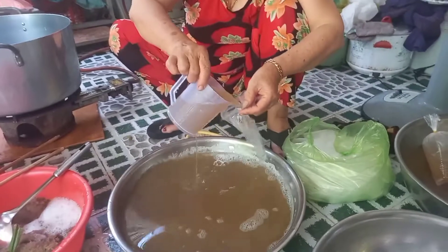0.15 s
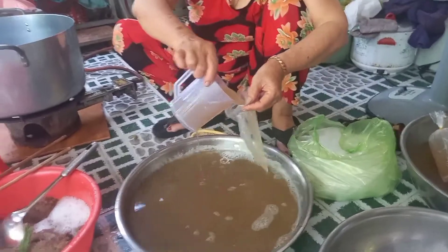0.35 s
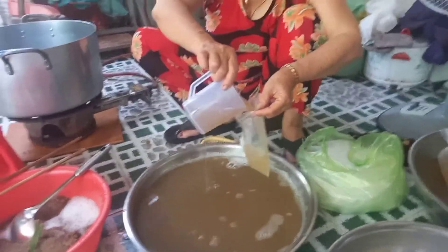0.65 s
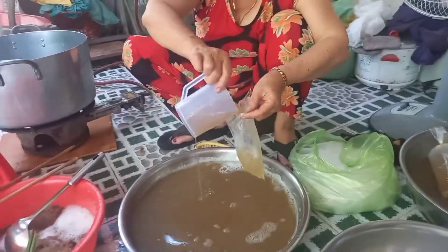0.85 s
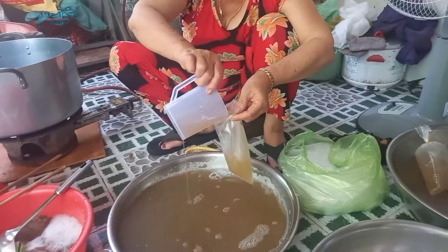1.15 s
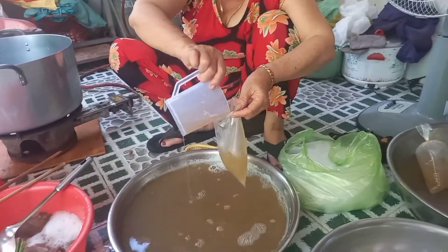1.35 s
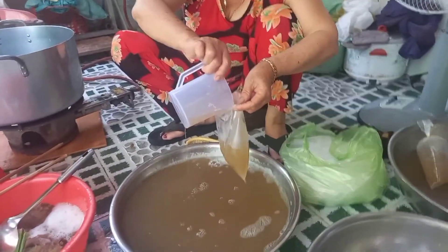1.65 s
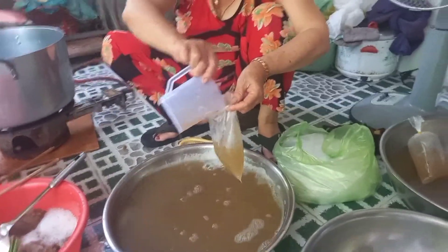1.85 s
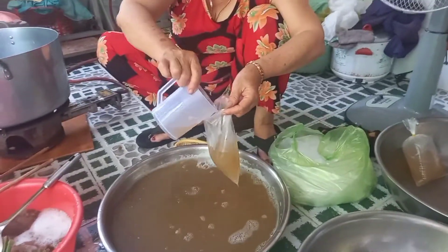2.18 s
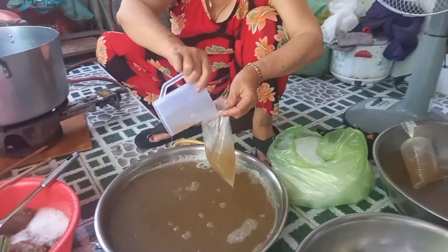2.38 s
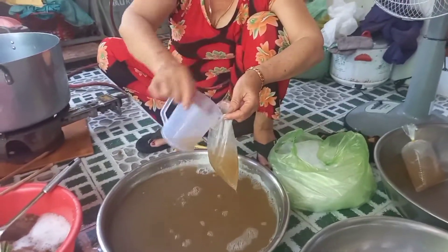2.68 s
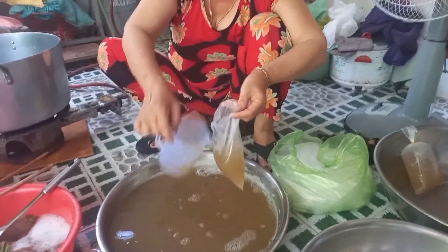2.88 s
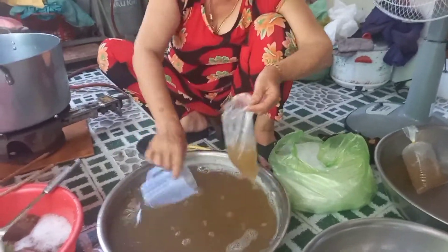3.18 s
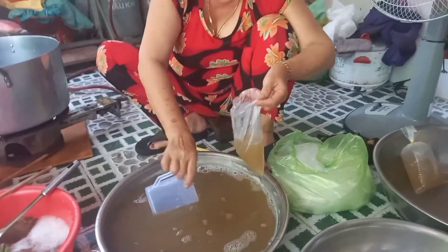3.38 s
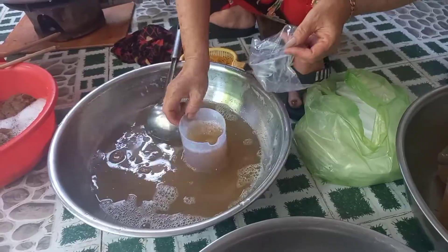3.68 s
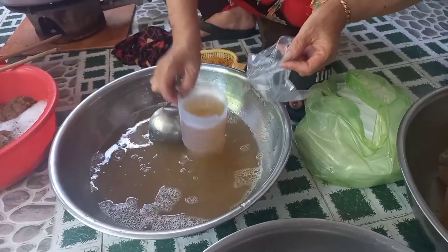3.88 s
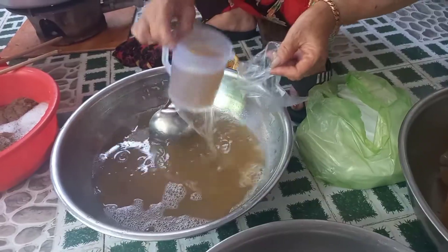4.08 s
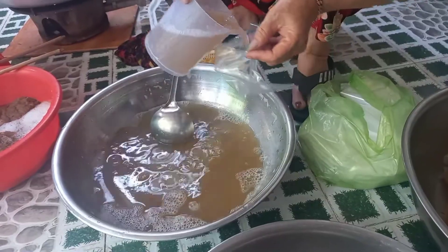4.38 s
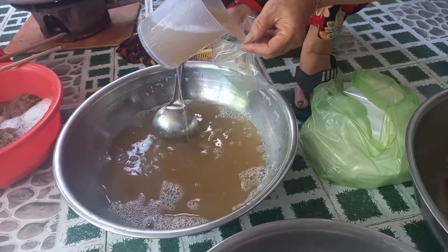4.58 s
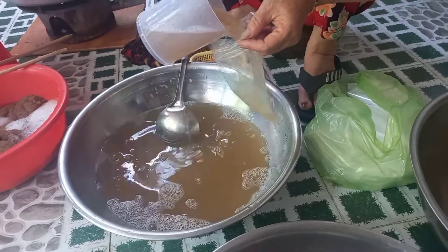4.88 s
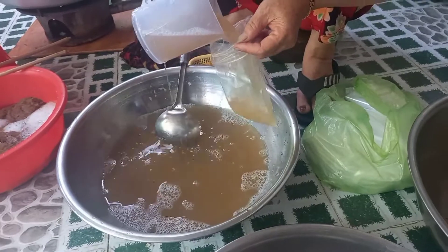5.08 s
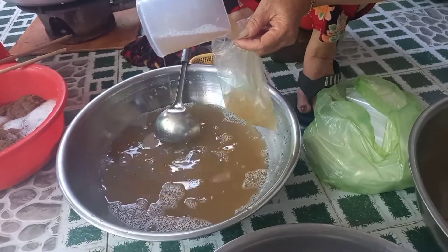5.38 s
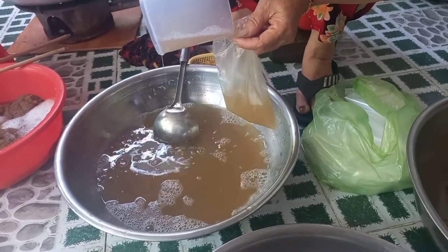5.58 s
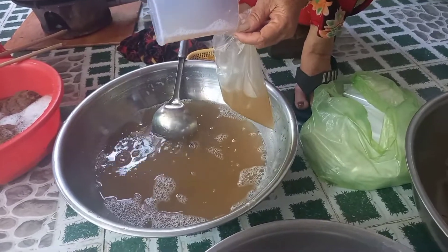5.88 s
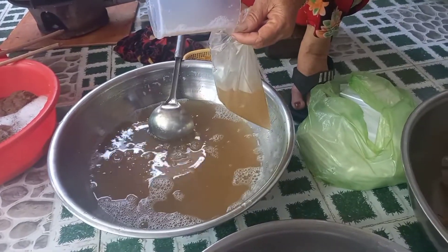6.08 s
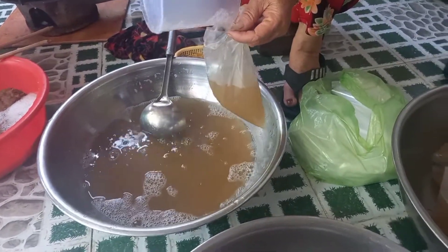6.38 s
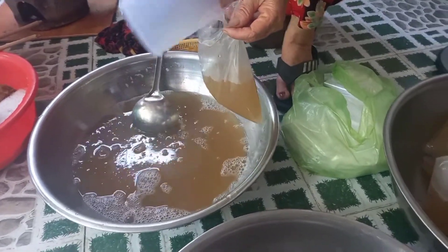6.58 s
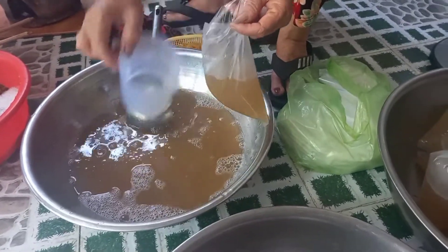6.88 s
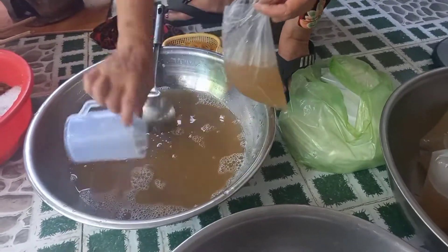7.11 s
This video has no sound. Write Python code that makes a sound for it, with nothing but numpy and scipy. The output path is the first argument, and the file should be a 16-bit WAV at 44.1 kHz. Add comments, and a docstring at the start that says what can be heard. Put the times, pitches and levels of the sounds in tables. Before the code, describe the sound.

Two pours of liquid bubble and drip into small plastic bags that snap and rustle, while cicadas whine outside the room.

```python
"""In an open room, liquid is poured from a jug into thin plastic bags. Bubbles ring as blips and
gurgles, air glugs in the jug, and the plastic snaps and rustles in tiny cracks. Outside, cicadas
click so fast that they whine; a fan throbs, and later a far motor hums. There are two parts with
a short silence between them: the first is close and loud, the second comes up from a low level."""
import sys
import numpy as np
from scipy import signal
from scipy.fft import rfft, irfft, next_fast_len
from scipy.io import wavfile
from scipy.ndimage import uniform_filter1d, map_coordinates

SR = 44100
rng = np.random.default_rng(int(sys.argv[2]) if len(sys.argv) > 2 else 0)


def transcribe(u):
    """Save the signal u as a 16-bit wav file named by the first command-line argument.

    u: samples, shape (n,) or (channels, n), limited to [-1, 1]; the rate is SR.
    q: integer samples, one column per channel.
    """
    v = np.clip(np.atleast_2d(u).T, -1, 1)
    q = np.round(v * 32767).astype(np.int16)
    wavfile.write(sys.argv[1], SR, q)


N = 319725
TIME = np.arange(N) / SR
# The two parts of the scene: start_s, end_s
PARTS = [(0, 3.337), (3.4757, 7.3)]
FIRST, SECOND = PARTS


def amp(db):
    return 10 ** (np.asarray(db) / 20)


def unit(x):
    """Scale a signal to an average power of 1."""
    return x / np.sqrt(np.mean(x ** 2) + 1e-20)


def along(points, hz):
    """Look up a value between rows of (pitch_hz, value), on a log scale of pitch."""
    pitches, values = np.transpose(points)
    return np.interp(np.log(hz + 1), np.log(pitches + 1), values)


def curves(rows):
    """Join the dots: one value per sample for each column after the time."""
    times, *columns = np.transpose(rows)
    return [np.interp(TIME, times, column) for column in columns]


def sides(pan_db):
    """Left and right gains; a positive pan_db is louder on the left."""
    return amp(np.vstack([pan_db / 2, -pan_db / 2]))


def add(out, start_s, sound):
    """Mix a short sound in at its start time."""
    out[:, round(start_s * SR):][:, :sound.shape[-1]] += sound


def wobble(rate_hz, channels=1):
    """Smooth random curves that pass rate_hz random points a second."""
    points = rng.standard_normal((channels, int(N * rate_hz / SR) + 4))
    coarse = np.arange(0, N + 16, 16)
    smooth = [map_coordinates(row, [coarse * rate_hz / SR]) for row in points]
    return np.array([np.interp(np.arange(N), coarse, row) for row in smooth])


def filtered(x, gain):
    """Turn each frequency up or down by gain(hz)."""
    size = next_fast_len(x.shape[-1] + 8192)
    return irfft(rfft(x, size) * gain(np.fft.rfftfreq(size, 1 / SR)), size)[..., :x.shape[-1]]


# How alike noise is in the two ears (1 is the same): pitch_hz, likeness
EAR_LIKENESS = [(30, 1), (200, 0.83), (500, 0.82), (1200, 0.42), (3000, 0.047), (15000, 0.15)]

def rush(spectrum, patchy_db, span=(0, 8)):
    """Stereo noise with random louder and softer patches, silent outside the span (in seconds)."""
    start, end = round(span[0] * SR), min(round(span[1] * SR), N)
    cells = signal.stft(rng.standard_normal((2, end - start)), nperseg=512)[2]
    patches = uniform_filter1d(rng.standard_normal(cells.shape[1:]), 6, axis=0)
    patches = unit(uniform_filter1d(patches, 10, axis=1))
    noise = signal.istft(cells * amp(patchy_db * patches), nperseg=512)[1][:, :end - start]

    def gain(hz):
        spread = np.arccos(np.clip(along(EAR_LIKENESS, hz), -1, 1)) / 2
        return amp(along(spectrum, hz)) * [np.cos(spread), np.sin(spread)]

    mid, side = filtered(noise, gain)
    left = np.roll(mid + side, 12)  # reaches the left ear 12 samples later
    return np.pad(unit(np.array([left, mid - side])), ((0, 0), (start, N - end)))


def background_db(start, first_end, low, risen, end):
    """A level that drifts through each part and comes up early in the second."""
    rise_s = (3.98, 4.86)
    return np.interp(TIME, [*FIRST, SECOND[0], *rise_s, SECOND[1]],
                     [start, first_end, low, low, risen, end])


# The tone of the moving air in each part: pitch_hz, level_db
FIRST_AIR = [(18, -58.5), (30, -8.5), (92, -4.5), (188, -14), (280, -12.5), (454, -17), (564, -15.5),
             (685, -18.5), (814, -17.5), (1690, -19.5), (1890, -22), (2550, -22.5), (3600, -29),
             (5200, -23.5), (6760, -72), (11400, -120)]
SECOND_AIR = [(140, -5), (240, -4), (280, -6), (396, -5.5), (475, -10.5), (951, -16.5), (1300, -14),
              (1830, -20), (2470, -15), (4070, -27), (5200, -20), (6760, -60), (11400, -120)]

def air():
    """Moving air makes a low, uneven rush."""
    level_db = background_db(-30.5, -33.5, -61.5, -45.5, -47) + 1.03 * wobble(8)
    first = rush(FIRST_AIR, patchy_db=1.26, span=(0, SECOND[0]))
    second = rush(SECOND_AIR, patchy_db=1.3, span=SECOND)
    return amp(level_db) * (first + second)


# The tone of the high hiss: pitch_hz, level_db
HISS_TONE = [(3500, -120), (4500, -28), (5330, -5), (5550, 6), (6100, 9), (6900, 2), (7600, -14), (9000, 0),
             (12500, -12), (13300, -20), (15800, -36)]

def hiss():
    """Plastic and far insects blur into a high hiss."""
    level_db = background_db(-36.5, -37, -60, -48, -45.5) + 0.51 * wobble(5.7)
    return amp(level_db) * rush(HISS_TONE, patchy_db=2.2) * sides(-.8)


def hum(tones, blur, fade_db, tilt_db=0 * TIME):
    """Low tones that waver (blur) and trade strength; tilt_db favours those above 196 Hz."""
    step = 16  # low tones need only every 16th sample
    t, tilt_db = TIME[::step], tilt_db[::step]

    def slow(rate_hz):
        return map_coordinates(rng.standard_normal(int(N * rate_hz / SR) + 4), [t * rate_hz])

    gains = np.array([amp(db + fade_db * slow(5.4) + tilt_db * np.sign(hz - 196) / 2)
                      for hz, db in tones])
    gains /= np.linalg.norm(gains, axis=0)
    total = 0
    for gain, (hz, _) in zip(gains, tones):
        phase = 2 * np.pi * hz * t + blur * slow(6)
        ear_drift = 0.27 * np.array([slow(4.4), slow(2.9)])
        total += gain * np.cos(phase + ear_drift)
    return unit(signal.resample_poly(total, step, 1, axis=1)[:, :N])


# How loud the fan is: time_s, level_db
FAN_LEVEL = [(0, -35), (1.2, -34), (1.45, -37), (1.9, -37.5), (2.25, -29), (2.6, -33.5), (3.1, -31.5),
             (3.23, -28.5), (3.4, -45), (3.47, -66.5), (4, -68), (4.5, -50.5), (4.85, -45), (5.2, -47.5),
             (5.8, -43.5), (6.3, -46.5), (7.25, -47.5)]
# The tones of its blades: pitch_hz, level_db
FAN_TONES = [(56, -8), (66.5, -5), (83, -2.5), (100, 0), (117, -5)]

def fan():
    """Turning blades push the air in a deep, unsteady throb."""
    (level_db,) = curves(FAN_LEVEL)
    return amp(level_db + 1.5 * wobble(7)) * hum(FAN_TONES, blur=.9, fade_db=4)


# How loud the motor is, and how far its upper tones are favoured: time_s, level_db, tilt_db
MOTOR_LEVEL = [(3.48, -76, 8), (3.95, -74.5, 7), (4.05, -62.5, 6), (4.5, -55.5, -6), (4.76, -62, -1),
               (4.89, -45.5, 2), (5.45, -40.5, 5), (5.63, -42.5, -1), (5.84, -42, -16), (6.1, -38.5, -3.5),
               (6.48, -45, -0.5), (6.62, -40.5, 11), (6.86, -46.5, -4), (7.06, -46.5, -6), (7.25, -48, 1)]
# The tones of its hum: pitch_hz, level_db
MOTOR_TONES = [(151, -8), (181.2, -1.5), (211.4, 0), (241.6, -17.5), (332, -13.5), (392, -17)]

def motor():
    """A far motor hums, in the second part only."""
    level_db, tilt_db = curves(MOTOR_LEVEL)
    level = (TIME > SECOND[0]) * amp(level_db + .6 * wobble(6))
    return level * hum(MOTOR_TONES, blur=0.2, fade_db=1.2, tilt_db=tilt_db)


def cicada(rate, song, side, voice, span, pulse, pulse_hz, blur, fade_db, drift_hz):
    """A cicada clicks drum-like skins on its body, making tones at multiples of the click rate."""
    here = slice(round(span[0] * SR), round(span[1] * SR))
    level_db, pan_db = curves(song)[0][here], curves(side)[0][here]
    swelling, steady = amp(level_db), amp(uniform_filter1d(level_db, SR // 2))
    phase = 2 * np.pi * np.cumsum(curves(rate)[0][here]) / SR
    rasp = .16 if span[0] > 0 else .3  # how uneven the clicks are
    step = 64  # samples between points of the slow curves
    t = span[0] + np.arange(len(level_db) // step + 3.5) * step / SR
    between = np.arange(step) / step
    smoother = np.array([map_coordinates(row, [(t - span[0]) * drift_hz]) for row in np.eye(48)])
    offsets, offset_db = np.transpose(pulse)
    out = np.zeros((2, N))
    for multiple, db in voice:
        level = swelling if db > -3 else steady  # only the strongest tones swell quickly
        tone = level * np.exp(1j * multiple * phase)
        for ear in out:
            # Pulsing splits the tone into close neighbours, which echoes fade one by one.
            fade, drift = rng.standard_normal((2, len(offsets), len(smoother))) @ smoother
            turns = pulse_hz * np.outer(offsets, t) + rng.random((len(offsets), 1))
            gains = amp(offset_db[:, None] + fade_db * fade)
            neighbours = gains * np.exp(1j * (2 * np.pi * turns + blur * drift))
            flutter = amp(db) * neighbours.sum(axis=0) / np.linalg.norm(gains, axis=0)
            flutter *= 1 + rasp * unit(uniform_filter1d(rng.standard_normal(len(t)), size=5))
            per_sample = (flutter[:-1, None] + np.diff(flutter)[:, None] * between).ravel()
            ear[here] += (per_sample[:len(tone)] * tone).real
    out[:, here] *= np.sqrt(2) * sides(pan_db)
    return out


# How fast each cicada makes its pairs of clicks: time_s, rate_hz
NEAR_RATE = [(0, 320.3), (.8, 320.45), (1.2, 321), (2.8, 321.6), (3.34, 321.7)]
PASSING_RATE = [(.8, 317.2), (1.7, 317.4), (2.4, 318)]
FAR_RATE = [(0, 300.6), (1.8, 300.4), (3, 299.8)]
THIN_RATE = [(0, 318.5), (3.34, 318.5)]
LATE_RATE = [(3.48, 304.4), (5.5, 306.15), (6.9, 307.05), (7.25, 307.25)]
FAINT_RATE = [(3.48, 294.9), (7.25, 294.7)]
# How each song swells and fades: time_s, level_db
NEAR_SONG = [(0, -26), (.13, -31.5), (.21, -37.5), (.45, -35.5), (.63, -29.5), (.88, -27.5), (1.1, -38.5),
             (1.32, -35), (1.53, -35), (1.67, -26.5), (1.77, -34), (1.92, -30), (2.1, -45.5), (2.5, -37.5),
             (2.76, -26.5), (2.951, -35.5), (3.19, -44), (3.34, -34)]
PASSING_SONG = [(0, -54), (.6, -62), (.9, -48), (1.4, -38.5), (1.8, -43), (2.2, -36.5), (2.6, -56.5),
                (3.3, -52)]
FAR_SONG = [(0, -40), (.4, -36), (.62, -36), (.9, -45), (1.4, -35), (1.65, -46), (1.95, -32), (2.7, -39.5),
            (3.3, -35.5)]
THIN_SONG = [(0, -48), (.3, -67), (.65, -77), (1.2, -51), (1.6, -53), (2, -48.5)]
LATE_SONG = [(3.48, -48.5), (4.07, -49.5), (4.38, -40.5), (4.7, -44), (4.86, -36), (5.221, -40.5),
             (5.34, -36.5), (5.7, -41.5), (6.05, -36.5), (6.169, -44), (6.36, -34.5), (6.5, -38),
             (7.25, -41.5)]
FAINT_SONG = [(3.5, -73), (4.1, -65), (4.7, -55), (5.3, -69), (6.5, -91), (7.25, -72)]
# Where a song seems to sit: time_s, pan_db
NEAR_SIDE = [(0, -6.5), (.6, 0.5), (.88, -2), (1.3, -4), (2, 4), (3.3, -2)]
FAR_SIDE, THIN_SIDE = [(0, 5.5), (3.3, -3.5)], [(0, 2.3), (2, 2)]
LATE_SIDE = [(3.5, -3), (5.2, 0), (5.75, -11), (6.1, -4), (6.38, -6), (6.85, -3.5)]
# The tones in each voice: multiple_of_rate, level_db
NEAR_VOICE = [(16, -33.5), (17, -4), (18, -10), (19, 4), (20, -5.5), (21, -9.5), (22, -18), (24, -21),
              (26, -28.5), (27, -39.5), (28, -24.5), (30, -18.5), (32, -20.5), (33, -38), (34, -28),
              (36, -23.5), (38, -28), (40, -27.5)]
PASSING_VOICE = [(17, -10.5), (19, -2.5), (20, -2.5)]
FAR_VOICE = [(18, -2.5), (18.5, -27), (19, -15), (19.5, -3), (20, -4.5), (21, -25), (22, -22)]
THIN_VOICE = [(18.5, -21), (19.5, 5.5), (20.5, -1.5), (21.5, -27.5)]
LATE_VOICE = [(18, -11.5), (19, -16.5), (20, 1.5), (21, -19), (22, -9), (24, -22.5), (26, -26), (28, -26),
              (30, -20.5), (32, -22), (34, -25), (36, -43.5), (38, -35), (39, -33.5), (40, -30), (42, -34)]
FAINT_VOICE = [(20, -22), (22, 4.5)]
# The close neighbours that make a tone pulse: offset_in_pulse_rates, level_db
NEAR_PULSE = [(-3, -23), (-2, -11), (-1, -8), (0, 1.5), (1, -8), (2, -27)]
PLAIN_PULSE = [(-2, -12.5), (-1, -4.5), (0, 1), (1, -3.5), (2, -16.5), (3, -34)]
WEAK_PULSE = [(-1.7, -24), (0.96, -16), (0.39, -12)]

def cicadas():
    """Four cicadas whine outside in the first part, and two in the second."""
    out = cicada(NEAR_RATE, NEAR_SONG, NEAR_SIDE, NEAR_VOICE, FIRST, NEAR_PULSE,
                 pulse_hz=27.2, blur=.9, fade_db=5.5, drift_hz=8)
    out += cicada(PASSING_RATE, PASSING_SONG, THIN_SIDE, PASSING_VOICE, FIRST, PLAIN_PULSE,
                  pulse_hz=29.2, blur=.46, fade_db=5, drift_hz=4.6)
    out += cicada(FAR_RATE, FAR_SONG, FAR_SIDE, FAR_VOICE, FIRST, WEAK_PULSE,
                  pulse_hz=26.37, blur=.7, fade_db=5, drift_hz=6)
    out += cicada(THIN_RATE, THIN_SONG, THIN_SIDE, THIN_VOICE, FIRST, WEAK_PULSE,
                  pulse_hz=28.2, blur=.23, fade_db=11.5, drift_hz=12)
    out += cicada(LATE_RATE, LATE_SONG, LATE_SIDE, LATE_VOICE, SECOND, PLAIN_PULSE,
                  pulse_hz=25.73, blur=.7, fade_db=4.5, drift_hz=6)
    out += cicada(FAINT_RATE, FAINT_SONG, LATE_SIDE, FAINT_VOICE, SECOND, PLAIN_PULSE,
                  pulse_hz=25.3, blur=3.3, fade_db=-2, drift_hz=6.4)
    return out


# How long the room's echo takes to fade by 60 dB: pitch_hz, fade_s
ECHO_FADE = [(200, 0.2), (2000, 0.36), (10000, 0.08)]

def room_echo(x):
    """The walls throw sound back, and each pitch dies away at its own speed."""
    hz, t, cells = signal.stft(rng.standard_normal((2, SR // 2)), SR, nperseg=256)
    tail = signal.istft(cells * amp(-60 * t / along(ECHO_FADE, hz)[:, None]), SR, nperseg=256)[1]
    delayed = np.pad(x, ((0, 0), (200, 0)))
    return signal.fftconvolve(delayed, tail / np.linalg.norm(tail[0]), axes=1)[:, :N]


# Small taps: start_s, level_db, pitch_hz, cycles_to_fade_30_db, pan_db
TICKS = [(0.768, -5, 5600, 4.4, -1), (0.779, -11, 4570, 6, -7), (.783, -8, 4500, 9.1, 1),
         (3.072, -20, 973, 8.6, -12), (3.074, -20, 1410, 11, -5), (3.081, -22.5, 1720, 14, 1),
         (4.68, -27, 3900, 3, -3), (4.7, -24, 4530, 4.9, -3), (4.942, -26, 3050, 5, -4),
         (4.999, -29.5, 2900, 8.7, -6), (5.145, -31, 3310, 6.4, 5), (5.181, -27, 2012, 8.2, 2),
         (5.380, -22, 3500, 3.9, 1), (5.399, -30, 2480, 13.5, -2), (5.427, -31, 1910, 10, 0),
         (5.441, -32, 2100, 8, 0), (5.463, -36, 2800, 13, 3), (5.741, -31, 4340, 11.6, -2),
         (6.1196, -11.5, 2600, 1.23, -27), (6.192, -43, 2540, 4.6, -3), (6.279, -34, 2540, 4.5, -4),
         (6.42, -28, 3940, 3.6, 2), (6.523, -36, 3250, 13, 0), (6.728, -34, 3150, 4.5, -1.5),
         (6.728, -29, 9200, 13, -5), (6.836, -32, 4910, 5, -2.5)]

def ticks():
    """Fingers, jug and drops make dry taps that ring for only a few cycles."""
    t = np.arange(SR // 50) / SR
    out = np.zeros((2, N))
    for start_s, db, hz, cycles, pan_db in TICKS:
        envelope = amp(db - 30 * t * hz / cycles) * (1 - np.exp(-1.5 * t * hz))
        add(out, start_s, envelope * np.sin(2 * np.pi * hz * t) * sides(pan_db))
    return out


# Snaps of the bag: start_s, level_db, dull_part_db (added to level_db), rustle_db
SNAPS = [(0.062, -7.5, 10, -28), (0.1496, -13, -12, -53.5), (0.216, -18, 5, -54.5), (0.3506, -10.5, 4, -50),
         (0.766, -15, 6.5, -33.5), (0.435, -30, -10, -57), (.876, -17.5, -3, -33), (0.945, -14.5, 3, -39.5),
         (1.0024, -21.5, 21.5, -26.5), (1.044, -29.5, 11, -43.5), (1.0863, -29.5, 20, -43),
         (1.2581, -9.5, 4.5, -35), (1.353, -16, -3.5, -31), (1.501, -9.5, -24, -39),
         (2.171, -11.5, -25, -59.5), (2.843, -28, 14.5, -59), (3.0712, -27, 13, -46),
         (4.1764, -38, 10, -69), (4.682, -41, 14, -47.5), (4.7385, -26, -3, -52.5), (4.842, -26, -22, -63),
         (4.873, -37, -5, -59), (4.9195, -35, 5, -54), (4.999, -22, -15, -55), (5.0055, -32, -20, -58),
         (5.0403, -33.5, -20, -50), (5.121, -30, -20, -55), (5.1966, -18.5, -20, -56),
         (5.377, -39.5, 11, -46), (5.5178, -20.5, -3, -46), (5.977, -23.5, -7, -69),
         (6.279, -42, -8, -78.5), (6.832, -33, -18, -48.5)]

def bag_snaps():
    """Each snap is a clump of tiny cracks in the plastic, with a bright part and a duller part."""
    t = np.arange(SR // 12) / SR
    snap_fade_s, crack_fade_s, crack_db = .035, .007, 15  # a short first crack stands out
    envelope = amp(-60 * t / snap_fade_s) + amp(crack_db - 60 * t / crack_fade_s)
    envelope *= 1 - np.exp(-t / 0.00058)
    out = np.zeros((2, N))
    for start_s, db, dull_db, _ in SNAPS:
        edge_hz, pan_db = (7900, -11) if start_s > SECOND[0] else (5450, -4)
        noise = rng.standard_normal((2, len(t)))
        cracks = noise * amp(2 * rng.standard_normal(len(t)) - crack_db) * envelope
        bright = filtered(cracks, lambda hz: 1 / (1 + (edge_hz / (hz + 1)) ** 6) / (1 + (hz / 12e3) ** 6))
        dull = filtered(cracks, lambda hz: 1 / (1 + (1300 / (hz + 1)) ** 4) / (1 + (hz / 5000) ** 6))
        add(out, start_s, amp(db) * (bright * sides(pan_db) + amp(dull_db - 68 * t) * dull))
    return out


# The tone of rustling plastic: pitch_hz, level_db
PLASTIC_TONE = [(900, -120), (1500, 2.5), (2600, 4.5), (4000, 3.5), (7000, -1), (11000, 2), (14500, -4.5),
                (15800, -25.5)]

def bag_rustle():
    """The handled plastic rustles in fine grains, building up to each snap and dying after it."""
    rise_s, fade_s = 0.0067, 0.39
    level = amp(background_db(-64, -64, -87.5, -63.5, -63.5))
    for start_s, _, _, db in SNAPS:
        near = slice(max(round((start_s - .1) * SR), 0), round((start_s + .4) * SR))
        t = TIME[near] - start_s
        level[near] += amp(db - 60 * np.maximum(t, 0) / fade_s) * np.exp(np.minimum(t, 0) / rise_s)
    clumps = amp(2.3 * wobble(110) + 1.6 * wobble(770, channels=2))
    return level * unit(clumps * rush(PLASTIC_TONE, patchy_db=2.5)) * sides(-4.5)


# A knock on the jug: start_s, level_db
KNOCK = [(0.197, -19)]
# The tones the jug rings with: pitch_hz, level_db, fade_s
JUG_TONES = [(662, 3.5, 0.027), (532, -6, 0.11), (628, -1.5, 0.17), (687, 0.5, 0.23), (801, -9.5, 0.14),
             (996, -4, 0.025), (1500, -3.5, 0.012), (1760, -18, 0.19)]

def jug_knock():
    """A knock rings the jug's wall and the air inside."""
    t = np.arange(SR // 4) / SR
    ring = sum((-1) ** k * amp(db - 60 * t / fade_s) * np.sin(2 * np.pi * hz * t)
               for k, (hz, db, fade_s) in enumerate(JUG_TONES))
    out = np.zeros((2, N))
    for start_s, db in KNOCK:
        add(out, start_s, amp(db) * ring * sides(-3.5))
    return out


# Low glugs in the jug: middle_s, level_db, pitch_hz, length_s
GLUGS = [(0.445, -39, 297, 0.092), (0.544, -31.5, 259, 0.024), (0.876, -37.5, 231, 0.096),
         (1.115, -36, 263.3, 0.12), (1.31, -35.5, 334, .09), (1.503, -38, 227.7, 0.15),
         (1.788, -34.5, 215, 0.058), (1.97, -40.5, 413, 0.093), (2.29, -37, 212, 0.17)]

def glugs():
    """A big pocket of air makes a low note that swells and fades, wavering and rising slightly."""
    out = np.zeros(N)
    for middle_s, db, hz, length_s in GLUGS:
        near = slice(round((middle_s - .2) * SR), round((middle_s + .2) * SR))
        t = TIME[near] - middle_s
        phase = 2 * np.pi * hz * t * (1 + 0.1 * t) + .9 * np.sin(40 * t + hz)
        out[near] += amp(db) * np.exp(-(2 * t / length_s) ** 2) * np.sin(phase)
    return out * sides(-5)


# The stream into the bag: time_s, bubbles_per_s, level_db
POUR = [(0, 120, -37), (.5, 202, -39), (.62, 396, -29.5), (1.05, 408, -34), (1.4, 266, -33),
        (1.9, 114, -35.5), (2.5, 97, -82), (3.3, 55, -32), (3.5, 42, -63.5), (4.5, 72, -62),
        (4.75, 250, -53.5), (5.45, 250, -48.5), (5.6, 136, -50), (7.25, 93, -69)]

def gurgle():
    """The stream makes many small bubbles at random moments; each rings briefly, rising in pitch."""
    rate, level_db = curves(POUR)
    dice = rng.random((2000, 5))  # one row of random numbers per bubble
    gaps = -np.log(dice[:, 0] + 1e-9)
    start = np.searchsorted(np.cumsum(rate) / SR, np.cumsum(gaps))
    dice, start = dice[start < N], start[start < N]
    pitch, life, strength, side = dice.T[1:, :, None]
    hz, cycles = 750 * 4.38 ** pitch, 5 + 11 * life
    age = np.arange(800)  # in samples
    turns = hz * age / SR
    level = amp(level_db[start][:, None] - 3.72 * np.log(strength + 0.035))
    envelope = level * amp(-40 * turns / cycles) * (1 - np.exp(-turns))
    rings = envelope * np.sin(2 * np.pi * turns * (1 + 0.031 * turns / cycles))
    ears = sides(-1.5 + 8 * (side.ravel() - .5))
    positions = (start[:, None] + age).ravel()
    return np.array([np.bincount(positions, (rings * ear[:, None]).ravel(), N)[:N] for ear in ears])


# Bubbles and drips that stand out: start_s, level_db, pitch_hz
BLIPS = [(.245, -20, 1270), (.389, -24, 1195), (.589, -11.5, 2020), (0.608, -27, 1200), (.697, -19.5, 1020),
         (.722, -25.5, 946), (.749, -20.5, 1000), (.772, -24, 1100), (0.801, -29, 1060), (.896, -26, 1360),
         (0.973, -26, 1360), (0.995, -15.5, 1464), (1.01, -18.5, 980), (1.022, -25, 1150),
         (1.036, -16, 1510), (1.14, -24, 1430), (1.185, -39, 1450), (1.229, -23, 1247),
         (1.263, -17.5, 1246), (1.301, -27, 1090), (1.42, -23.5, 1005), (1.444, -32, 1090),
         (1.59, -15.5, 2080), (1.668, -23.5, 1390), (1.855, -22.5, 1600), (3.734, -53, 806),
         (3.97, -52, 980), (4.624, -43, 690), (4.689, -46, 740), (4.722, -45, 782), (4.741, -42, 760),
         (4.76, -46, 750), (4.843, -46, 1575), (4.85, -45, 1097), (4.94, -41, 1426), (4.958, -37, 1363),
         (5.019, -42, 1590), (5.07, -40, 1220), (5.086, -41, 1103), (5.182, -33, 1582), (5.198, -41, 1050),
         (5.242, -35, 1550), (5.363, -31, 1556), (5.392, -25.5, 1610), (5.41, -34, 1700), (5.44, -38, 1954),
         (5.459, -33, 1530), (5.503, -24, 2260), (5.505, -38, 1180), (5.739, -32, 2020)]

def blips():
    """A bubble rings at a pitch set by its size, rises a little, and drags three weaker ones along."""
    t = np.arange(SR // 10) / SR
    lead_s = np.array([[0], [.0002]])  # the pour is nearer the right ear

    def ring(age, hz, fade_s):
        phase = 2 * np.pi * hz * (age + lead_s) * (1 + 0.052 * age / fade_s)
        return np.sin(phase) * amp(-60 * age / fade_s) * (1 - np.exp(-age / 0.00081))

    out = np.zeros((2, N))
    for start_s, db, hz in BLIPS:
        fade_s = 43.4 / hz  # 43.4 cycles to fade by 60 dB
        pan_db = 2.5 + 8 * rng.uniform(-1.6, 1)
        group = ring(t, hz, fade_s)
        for wait, pitch, weaker in rng.random((3, 3)):
            age = np.maximum(t - .03 * wait ** 2, 0)
            group += amp(-5 - 7 * weaker) * ring(age, hz * np.exp(.4 * (pitch - .4)), fade_s)
        add(out, start_s, amp(db) * group * sides(pan_db))
    return out


def scene():
    """Mix the pouring and the bags with their echo, the cicadas and the room's own noise."""
    snaps = bag_snaps()
    pouring = blips() + gurgle() + jug_knock() + glugs()
    insects = cicadas()
    handling = ticks() + bag_rustle()
    echo = room_echo(amp(-4) * snaps + amp(-11) * pouring)
    room_noise = (fan() + motor() + air() + hiss()) * sides(-3.5)
    return room_noise + insects + echo + handling + snaps + pouring


def record(dry):
    """Cut the deep bass, silence the gap between the two parts, and drop the highest treble."""
    bass_hz, top_hz = 49, 15780
    fade_out = amp(np.interp(TIME - FIRST[1], [0, .002, .012, .025], [0, -20, -40, -48]))
    gate = fade_out * (TIME < 3.37) + (TIME > SECOND[0])
    bass_cut = filtered(dry, lambda hz: 1 / (1 + (bass_hz / (hz + 1)) ** 6))
    return filtered(bass_cut * gate, lambda hz: hz < top_hz)


dry = scene()
out = record(dry)
transcribe(out)
```